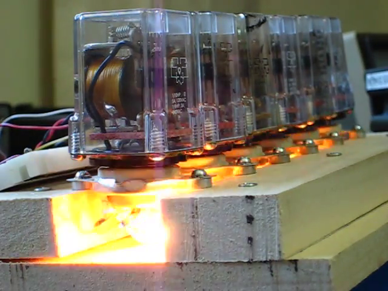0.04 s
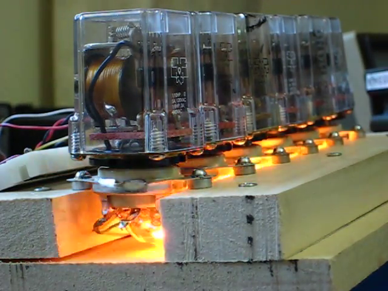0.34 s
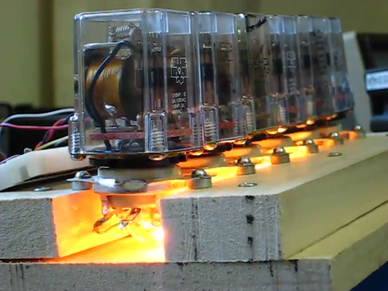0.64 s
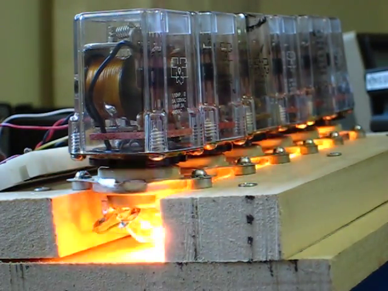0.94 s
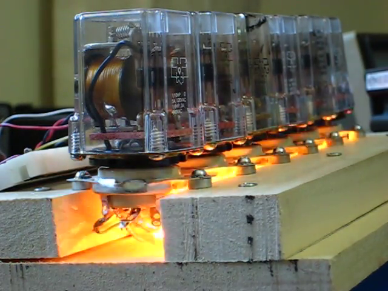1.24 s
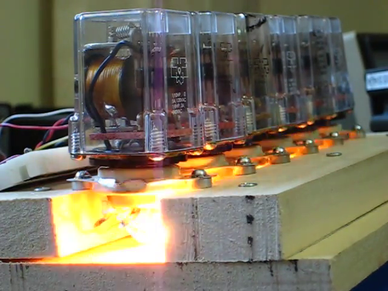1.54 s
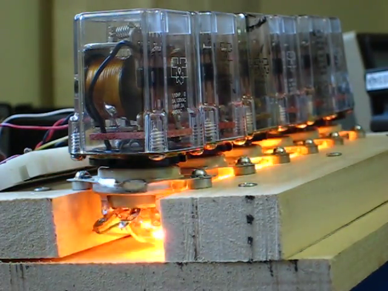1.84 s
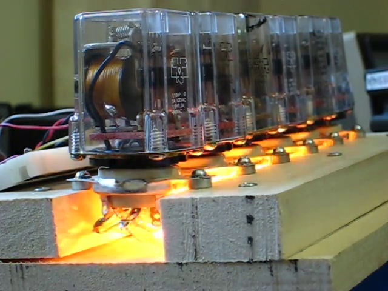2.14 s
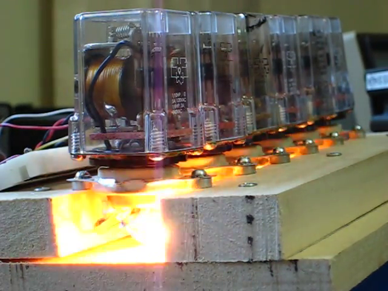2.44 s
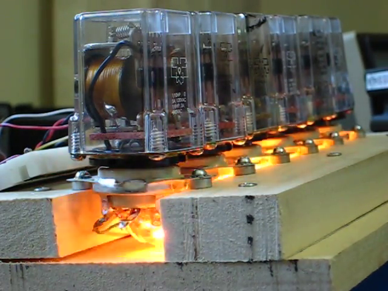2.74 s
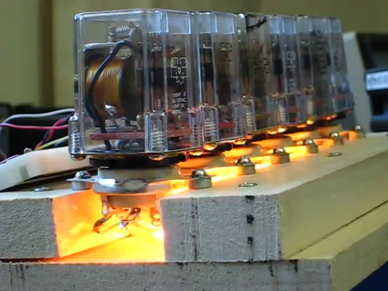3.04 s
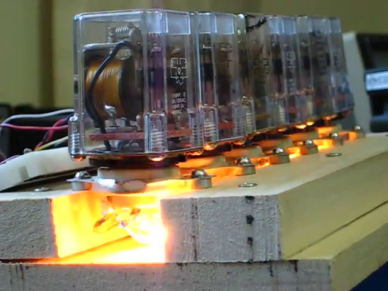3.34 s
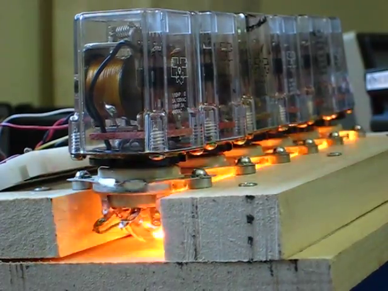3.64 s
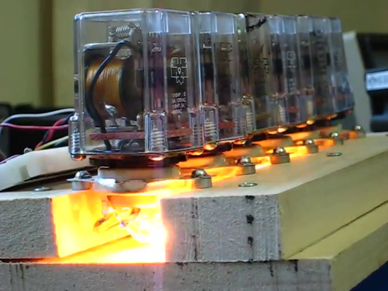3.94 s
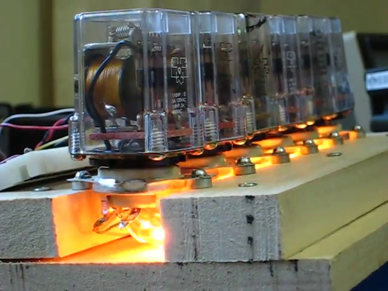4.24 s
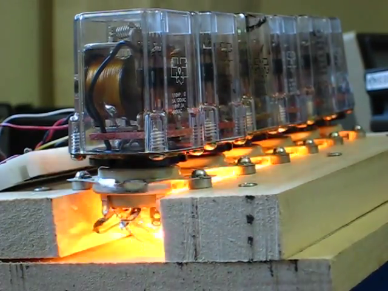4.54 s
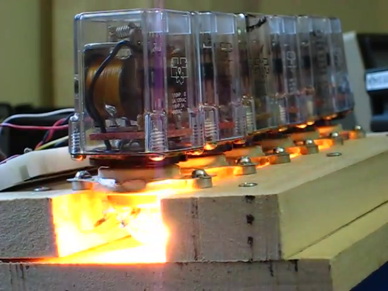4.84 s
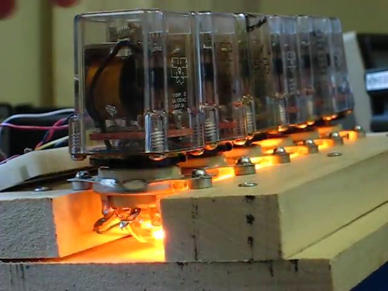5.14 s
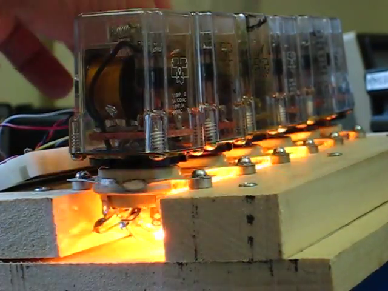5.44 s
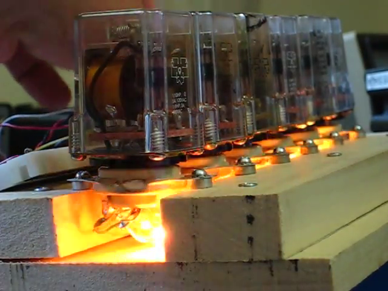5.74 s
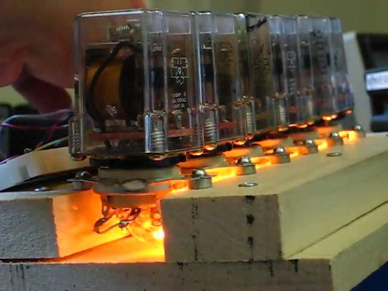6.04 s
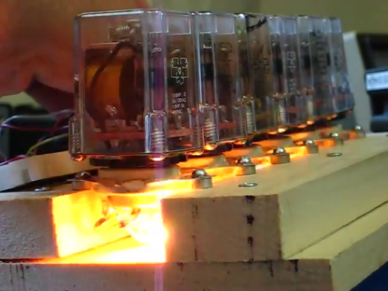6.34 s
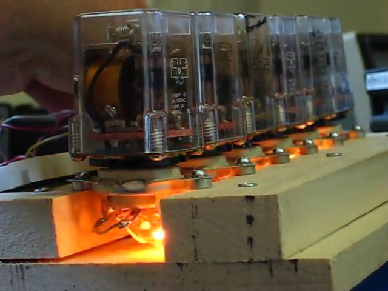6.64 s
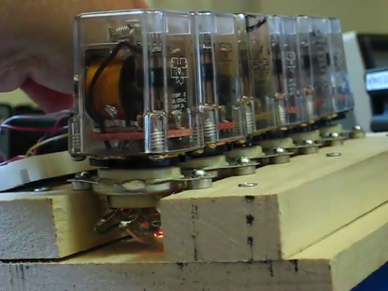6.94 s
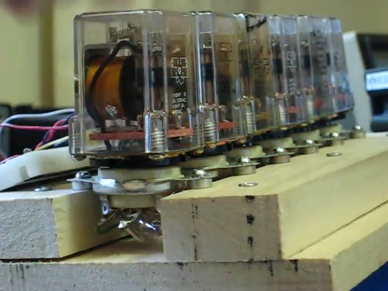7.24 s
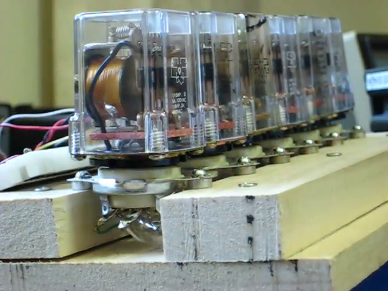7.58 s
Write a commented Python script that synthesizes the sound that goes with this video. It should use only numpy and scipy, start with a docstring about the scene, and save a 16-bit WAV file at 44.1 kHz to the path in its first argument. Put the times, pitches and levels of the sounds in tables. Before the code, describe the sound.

A row of relays on a wooden board clicks one after another in a fast, even chatter, sharp and metallic with a plastic rattle and a slight wooden knock. The pace shifts a little as the pattern cycles. After about six and a half seconds the clicking stops, springs ring out briefly, and a faint fan hum remains, with one soft tap at the very end. The microphone is close, in a small room.

```python
"""Six relays clicking in turn

Six plug-in relays on a wooden board are switched in turn, close up, about 28 clicks a second, the pace
shifting a little from round to round. Each click is two blows of the armature that ring the relay's
frame and clear cover; the board rings along, a small room answers and a fast limiter pumps.
When the switching stops, the springs ring out over the hum of the bench fans, with one soft tap."""
import sys
import numpy as np
from scipy import signal
from scipy.fft import rfft, irfft
from scipy.io import wavfile
from scipy.ndimage import uniform_filter1d

SR = 44100
rng = np.random.default_rng(int(sys.argv[2]) if len(sys.argv) > 2 else 0)


def dump(signal):
    """Clip the signal to [-1, 1] and save it as 16-bit WAV at the path in sys.argv[1]."""
    limited = np.clip(np.atleast_2d(signal).T, -1, 1)
    pcm = np.round(limited * 32767).astype(np.int16)
    wavfile.write(sys.argv[1], SR, pcm)


N = 335601


def gain_of(db):
    """Decibels to amplitude."""
    return 10 ** (np.asarray(db) / 20)


def curve_at(points, hz):
    """A curve of (Hz, value) points, joined on a log-frequency axis."""
    point_hz, value = np.transpose(points)
    return np.interp(np.log(hz + 1), np.log(point_hz + 1), value)


def add(mix, start_s, sound):
    """Mixes a sound in, trimming whatever falls outside the mix."""
    at = round(start_s * SR)
    sound = sound[max(-at, 0):]
    part = mix[max(at, 0):][:len(sound)]
    part += sound[:len(part)]


def noise(colour, size):
    """Noise of rms 1 with the given colour."""
    eq = gain_of(curve_at(colour, np.fft.rfftfreq(size, 1 / SR)))
    coloured = irfft(rfft(rng.standard_normal(size)) * eq, size)
    return coloured / coloured.std()


# Fan air and microphone hiss. Each row: frequency in Hz, relative level in dB.
AIR_COLOUR = [(25, -10), (120, -8), (290, 1), (450, -5.5), (1100, -1), (1500, -6.5), (2100, -6.5),
              (3500, -9.5), (8500, -13), (9900, -9), (13000, -16), (15500, -19), (17000, -30)]
# The hum of fans and motors. Each row: pitch in Hz, rms level in dB.
MOTOR_TONES = [(241.5, -52.5), (310, -61), (362, -61.5), (622, -64.5), (722, -61), (828, -58.5),
               (1244, -56.5), (1345, -63), (1656, -60.5), (1809, -66), (6605, -67), (15135, -65)]

def bench_fans(air_db=-46.5, waver_rad=0.14):
    """The bed: fans and motors hum in slightly wavering tones over a soft rush of air."""
    t = np.arange(N) / SR
    knots = np.linspace(0, t[-1], num=60)
    out = gain_of(air_db) * noise(AIR_COLOUR, N)
    for hz, db in MOTOR_TONES:
        drift = waver_rad * np.interp(t, knots, rng.standard_normal(len(knots)))
        out += np.sqrt(2) * gain_of(db) * np.sin(2 * np.pi * (hz * t + rng.random()) + drift)
    return out


# The tap's cue. Each row: start in seconds, level in dB.
TAP_CUES = [(7.539, -39)]
# Its dull colour. Each row: frequency in Hz, relative level in dB.
TAP_EQ = [(60, -17), (300, 4), (900, -3), (2800, -14), (6000, -26), (15000, -40)]

def bench_tap(t60=0.066, size=4096):
    """A soft tap on the bench: a dark puff of noise that dies fast."""
    out, t = np.zeros(N), np.arange(size) / SR
    for start, db in TAP_CUES:
        add(out, start, gain_of(db - 60 * t / t60) * noise(TAP_EQ, size))
    return out


# The length of the room's tail. Each row: frequency in Hz, t60 in seconds.
ROOM_DECAY = [(200, 0.81), (1000, 0.34), (3000, 0.46), (6000, 0.4), (9000, 0.36), (15000, 0.3)]
# The colour of that tail. Each row: frequency in Hz, level in dB against the direct sound.
ROOM_COLOUR = [(200, -10.5), (1200, 0), (1900, -3), (3000, -13.5), (6000, -12), (7200, -15.5), (9500, -9.5),
               (15000, -13)]

def room(direct, first_echo_s=0.005):
    """A small room: a dense tail whose bands die at their own speed."""
    echoes = rng.standard_normal(SR) * (np.arange(SR) / SR > first_echo_s)
    hz, t, bands = signal.stft(echoes, SR, nperseg=256)
    t60 = curve_at(ROOM_DECAY, hz)[:, None]
    unit_energy = np.sqrt(2 * np.log(1000) / (t60 * SR))
    fade = gain_of(curve_at(ROOM_COLOUR, hz)[:, None] - 60 * t / t60)
    tail = signal.istft(bands * unit_energy * fade, SR, nperseg=256)[1]
    return signal.fftconvolve(direct, tail)[:N]


# The shimmer of the springs. Each row: pitch in Hz, relative level in dB, t60 in seconds.
SPRING_MODES = [(2195, -14, 1.4), (2460, 2, 0.3), (2890, 1, 1.2), (3020, -4, .5), (3160, 5, 0.52),
                (3326, 3, 0.6), (3870, -11, 0.6), (4430, -10, 0.91), (4620, -12, 1.7), (5500, -16, 0.6),
                (6170, -4.5, 1.06), (12639, -4, .15), (12884, -7, .15)]

def springs(clicks, level_db=-47):
    """Every click feeds the springs energy and knocks their phase; in between they ring freely."""
    t, push, out = np.arange(N) / SR, np.zeros(N), np.zeros(N)
    for start, db in clicks:
        add(push, start, [gain_of(db) ** 2])
    hits = np.flatnonzero(push)
    for hz, db, t60 in SPRING_MODES:
        energy_kept = np.exp(-2 * np.log(1000) / (t60 * SR))
        energy = signal.lfilter([1], [1, -energy_kept], push)
        knock = np.zeros(N)
        knock[hits] = np.sqrt(push[hits] / energy[hits]) * rng.standard_normal(len(hits))
        out += gain_of(level_db + db) * np.sqrt(energy) * np.sin(2 * np.pi * hz * t + np.cumsum(knock))
    return out


# The wooden body under the clicks. Each row: pitch in Hz, t60 in seconds,
# then six relative levels in dB, one for each relay's place on the board.
BOARD_MODES = [(175.6, 0.17, -12, 6, -16, -4, -21, -2), (264, 0.21, 2, -3, -2.5, -16, 0.5, 5.5),
               (316.7, 0.31, 1, 7.5, -10, -13, -19, -15), (453, 0.12, -14, -1, 3, 2.5, 1, 11),
               (795, 0.078, -26, -24, -13, 11.5, 7.5, -24), (835, 0.074, 7, 10, -21, -5, -2.5, -17),
               (1021, 0.059, -36, -3, 12.5, -7, 13.5, 0), (1620, 0.022, -10, -9, -13, 22, -8, 20.5),
               (1848, 0.04, 6, 18, -16, 18.5, 28, 12.5)]

def board_rings(turn, count, level_db=-55):
    """The board's ring for each click of one relay; every click catches the modes in another phase."""
    t = np.arange(SR) / SR
    partials = np.array([gain_of(place_db[turn]) * np.exp((2j * np.pi * hz - np.log(1000) / t60) * t)
                         for hz, t60, *place_db in BOARD_MODES])
    phases = np.exp(2j * np.pi * rng.random((count, len(partials))))
    return gain_of(level_db) * (phases @ partials).real


# The drag on the tempo. Each entry: milliseconds added to every step of one round.
ROUND_WAITS_MS = [2, 2, 0, 2, 0, 1, 1, 0, 3, 2, 3, 3, 2, 1, 2, 1, 1, 1, 0, 3, 0, 1, 2, 3, 2, 0, 0, 3, 1, 0,
                  0]

def controller_steps(first_s=-.0076, shortest_ms=34.915):
    """The moments when the controller switches the next relay; the first round is already half over."""
    step_ms = shortest_ms + np.repeat(ROUND_WAITS_MS, 6)[3:]
    return first_s + np.r_[0, np.cumsum(step_ms)] / 1000


# Armature travel. Each entry: the seconds one relay needs to reach its contacts.
ARMATURE_TRAVEL_S = [.003, .0022, 0.001265, .0027, .00385, .0027]
# The clicks grow a little quieter towards the end. Each row: time in seconds, level in dB.
CLICK_LEVEL_CURVE = [(0, 5.8), (4.9, 4.5), (6.63, -0.6)]

def strokes(turn, jitter_s=.00012, scatter_db=0.05):
    """One relay's cues (seconds, level in dB): its armature lands just after every sixth step."""
    switched = controller_steps()[turn::6]
    late, loud = rng.standard_normal((len(switched), 2)).T
    click_db = np.interp(switched, *np.transpose(CLICK_LEVEL_CURVE)) + scatter_db * loud
    return np.c_[switched + ARMATURE_TRAVEL_S[turn] + jitter_s * late, click_db]


# The bright grit of contacts and covers. Each row: frequency in Hz, relative level in dB.
RATTLE_COLOUR = [(40, -32), (300, -20), (1200, -21.5), (1900, -15), (2500, -5), (3200, 3), (3900, -4),
                 (4600, 4.5), (7000, -3.5), (9500, -7), (13500, -9.5), (15500, -23), (17000, -57)]

def blows(modes, rise_s, rattle_db, rattle_t60, count, scatter_db=1.42, slip_rad=0.4, size=4096):
    """Repeats of one armature blow: frame and cover ring, loose parts rattle, never quite alike."""
    t = np.arange(size) / SR
    hz, t60, db = (column[:, None] for column in modes.T)
    # bending waves reach the cover at different moments, so the modes do not start together
    age = np.maximum(t - 0.0007017 * rng.random(hz.shape), 0)
    envelopes = (1 - np.exp(-age / rise_s)) * gain_of(db - 60 * age / t60)
    partials = envelopes * np.exp(2j * np.pi * (hz * age + rng.random(hz.shape)))
    strength, slip = rng.standard_normal((2, count, len(hz)))
    variation = gain_of(scatter_db * strength) * np.exp(1j * slip_rad * slip)
    tone = (variation @ partials).real
    grit = noise(RATTLE_COLOUR, (count + 1) * size).reshape(-1, size)
    shared = 0.53  # the parts chatter along much the same path at every stroke
    rattle = np.sqrt(shared) * grit[0] + np.sqrt(1 - shared) * grit[1:]
    return tone + rattle * (1 - np.exp(-t / rise_s)) * gain_of(rattle_db - 60 * t / rattle_t60)


# The character of each relay, in switching order. Each row: level in dB, lag of the second blow in
# seconds, rise of the first and of the second blow in seconds, relative rattle level of the first and
# of the second in dB, rattle t60 in seconds.
RELAY_VOICES = [(12, .0040, 0.004, 0.00056, -19.5, -11, 0.033),
                (6.5, .0118, 0.00046, 0.00038, -14, -15, 0.067),
                (12, .0084, 0.0002, 0.00092, -16.5, -17, 0.038),
                (10, 0.001316, 0.00032, 0.00052, -17, -21.5, 0.054),
                (5, 0.0053, 0.00075, 0.0006, -17, -17.5, .035),
                (3, 0.005, 0.00063, 0.00065, -21, -13.5, 0.056)]
# The ring of frame and cover, one table a relay. Each row: pitch in Hz, t60 in seconds,
# relative level in dB on the first blow, then on the second.
FRAME_A = [(2310, 0.012, -3.5, -20.5), (2501, 0.022, -8, -39), (2604, 0.0054, 9, -42),
           (2835, 0.054, -19.5, -23.5), (2968, 0.019, 0, -43), (3335, 0.013, -11, -19),
           (3505, 0.043, -39, -15), (3720, 0.0038, -14, 2), (4910, 0.0032, -1.5, 7), (5930, 0.0024, 3, -32),
           (5735, 0.057, -16, -36), (6480, 0.016, -35, -9.5), (6920, 0.022, -41, -7),
           (6600, 0.015, -18, -34), (7880, 0.026, -33, -20.5), (7596, 0.0066, 1, 2.5),
           (12400, 0.013, -34, -43), (11960, 0.01, -26, -8.5), (12950, 0.0097, -22, -14),
           (14380, 0.007, -19, -6.5), (13500, 0.016, -27, -25.5)]
FRAME_B = [(2450, 0.021, -23, -24), (2810, 0.042, -41, -19), (2873, 0.1, -17.5, -54),
           (2990, 0.055, -34, -40), (3260, 0.052, -21.5, -44), (3373, 0.21, -27, -27),
           (3320, 0.015, -26, -35), (3290, 0.026, -12, -34), (3620, 0.097, -25, -55),
           (4570, 0.027, -27.5, -48), (5015, 0.032, -16.5, -27), (5598, 0.038, -41, -34),
           (5750, 0.062, -19, -46), (5800, 0.071, -32, -21), (6460, 0.011, -20, -10),
           (7230, 0.021, -28, -38), (8000, 0.011, -24, -9.5), (8900, 0.022, -40, -26),
           (10840, 0.018, -17.5, -32), (11840, 0.016, -16, -45)]
FRAME_C = [(2360, 0.054, -24.5, -31), (2522, 0.058, -23.5, -36), (2774, 0.11, -39.5, -26.5),
           (2865, 0.026, -47, -12.5), (3245, 0.032, -43, -23.5), (3596, 0.057, -25, -45),
           (4194, 0.025, -20.5, -29), (4405, 0.062, -38, -19), (4405, 0.014, -8, -23),
           (4790, 0.085, -49, -22.5), (4990, 0.013, -39, -8), (5460, 0.04, -23, -24),
           (5280, 0.052, -16, -23.5), (5780, 0.0093, -6, -7.5), (5660, 0.13, -21.5, -36),
           (6400, 0.0097, -10.5, -41), (6920, 0.026, -12.5, -52), (8170, 0.0071, -2.5, -9),
           (11240, 0.004, -45, -0.5), (13730, 0.011, -18.5, -22)]
FRAME_D = [(2076, 0.014, -22.5, -47), (2320, 0.081, -33, -29), (2774, 0.072, -24.5, -37),
           (2725, 0.016, -37, -19.5), (3050, 0.0081, -21, -23), (3126, 0.12, -26.5, -28.5),
           (3222, 0.014, -10.5, -5), (3540, 0.079, -32, -25), (4400, 0.14, -45, -30),
           (4560, 0.052, -41, -24), (5630, 0.021, -13.5, -43), (5860, 0.028, -24, -36),
           (7120, 0.034, -10, -48), (6930, 0.0074, 1, -29), (7000, 0.046, -53, -39),
           (7650, 0.041, -21.5, -41), (7990, 0.044, -20.5, -37), (8700, 0.0057, -9, -30),
           (9750, 0.0037, -8.5, -35), (10240, 0.067, -29, -40)]
FRAME_E = [(2480, 0.02, -43, -14.5), (2765, 0.094, -30, -22), (3070, 0.019, -32, -21),
           (3044, 0.032, -11.5, -42), (3247, 0.012, -3, -12.5), (3357, 0.06, -28, -15.5),
           (4430, 0.033, -21, -27), (5290, 0.01, -20, -10.5), (6250, 0.013, -26, -16),
           (6840, 0.016, -14, -32), (9970, 0.0028, -3.5, 0.5), (10500, 0.04, -37, -31),
           (11150, 0.0042, -22, 1), (12100, 0.074, -43, -27), (12870, 0.0043, -47, 2.5),
           (12560, 0.061, -48, -23), (12760, 0.031, -50, -16), (13577, 0.062, -50, -29),
           (14169, 0.05, -38, -33), (15600, 0.0024, -18, 0.5)]
FRAME_F = [(2467, 0.037, -48, -18), (2580, 0.015, -51, -20), (2904, 0.023, -36, -16.5),
           (2990, 0.03, -42, -26), (3430, 0.0071, -34, -8.5), (3550, 0.024, -42, -25),
           (4160, 0.039, -27.5, -46), (4900, 0.11, -23, -43), (5037, 0.035, -44, -15),
           (5730, 0.019, -49, -29), (6040, 0.041, -49, -23), (5600, 0.05, -28, -38),
           (6170, 0.029, -44, -15.5), (6240, 0.016, -42, -23), (8880, 0.003, -4.5, -3),
           (10400, 0.04, -31, -39), (12150, 0.027, -42, -23), (13150, 0.0032, -13, -2.5),
           (12700, 0.025, -34, -34), (13433, 0.046, -37, -39)]

def relay(clicks, turn, modes):
    """One relay: the armature touches the contacts, then slams into its stop; the board rings along."""
    level_db, lag_s, touch_rise, slam_rise, touch_grit_db, slam_grit_db, grit_t60 = RELAY_VOICES[turn]
    modes, count = np.array(modes), len(clicks)
    touches = blows(modes[:, [0, 1, 2]], touch_rise, touch_grit_db, grit_t60, count)
    slams = blows(modes[:, [0, 1, 3]], slam_rise, slam_grit_db, grit_t60, count)
    rings = board_rings(turn, count)
    out = np.zeros(N)
    for (start, click_db), touch, slam, ring in zip(clicks, touches, slams, rings):
        gain = gain_of(level_db + click_db)
        add(out, start, gain * touch)
        add(out, start + lag_s * (1 + .035 * rng.standard_normal()), gain * slam)
        add(out, start, gain * ring)
    return out


def scene():
    """The mono mix: over the bed, each relay sounds dry and through the room; all shake the springs."""
    out, all_clicks = bench_fans() + bench_tap(), []
    for turn, modes in enumerate([FRAME_A, FRAME_B, FRAME_C, FRAME_D, FRAME_E, FRAME_F]):
        clicks = strokes(turn)
        direct = relay(clicks, turn, modes)
        out += direct + room(direct)
        level_db = RELAY_VOICES[turn][0]
        all_clicks += [(start, click_db + level_db) for start, click_db in clicks]
    return (out + springs(all_clicks))[None]


def record(dry, threshold_db=-11.5, slope=0.93, recovery_db_per_s=95, ceiling=0.75, cutoff_hz=17000):
    """A fast limiter ducks the mix at each loud click; the tallest peaks clip; a low-pass follows."""
    power_db = 10 * np.log10(abs(uniform_filter1d(dry[0] ** 2, size=132)) + 1e-12)
    recovery_db = np.arange(N) * recovery_db_per_s / SR
    held_db = np.maximum.accumulate(power_db + recovery_db) - recovery_db  # jumps up, sinks steadily
    over_db = np.maximum(held_db - threshold_db, 0)
    duck_db = slope * uniform_filter1d(over_db, size=44)
    limited = np.clip(dry / gain_of(duck_db), -ceiling, ceiling)
    low_pass = signal.firwin(255, cutoff_hz, window=("kaiser", 8), fs=SR)
    return signal.oaconvolve(limited, low_pass[None], "same")


dry = scene()
out = record(dry)
dump(out)
```